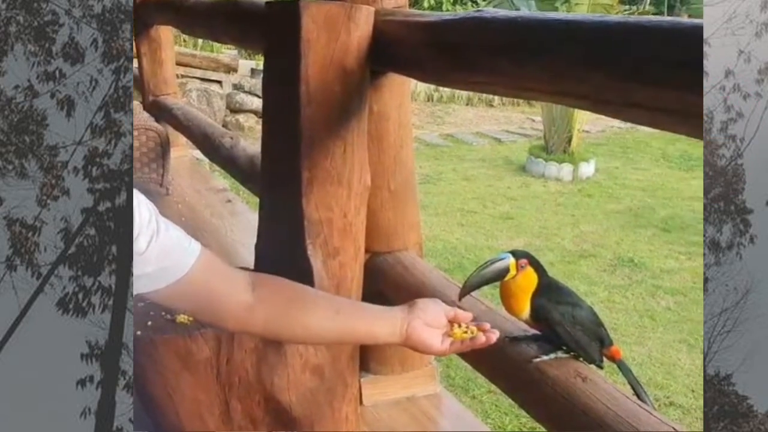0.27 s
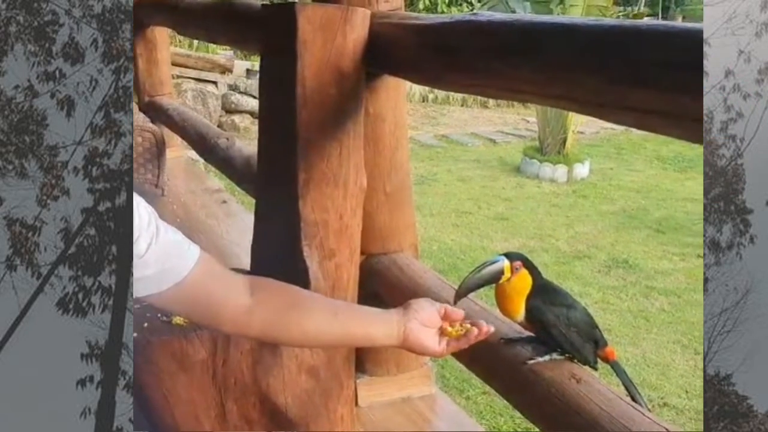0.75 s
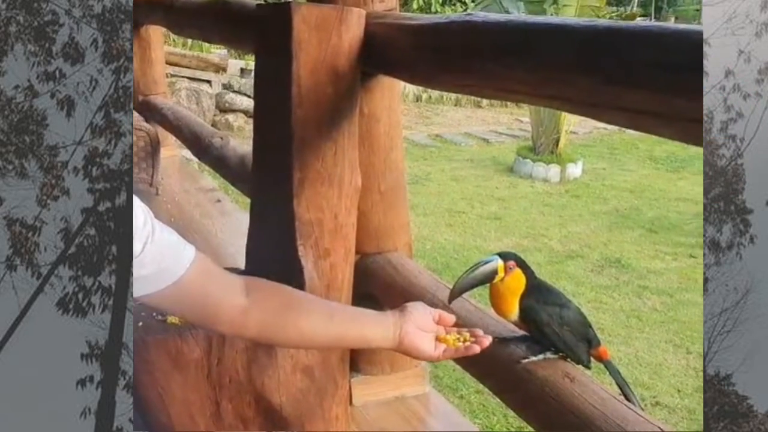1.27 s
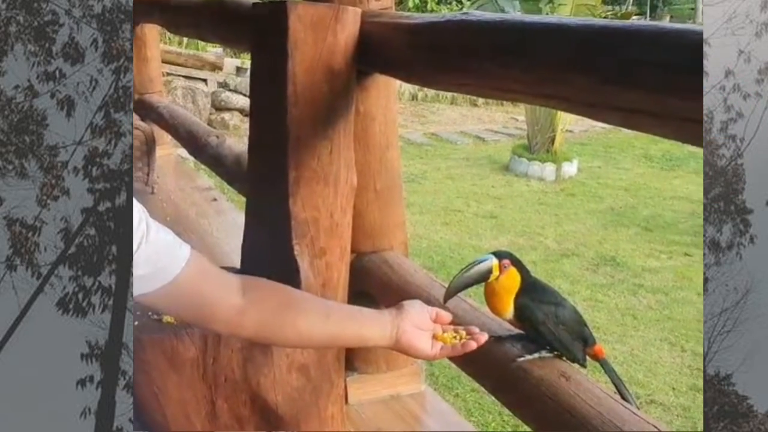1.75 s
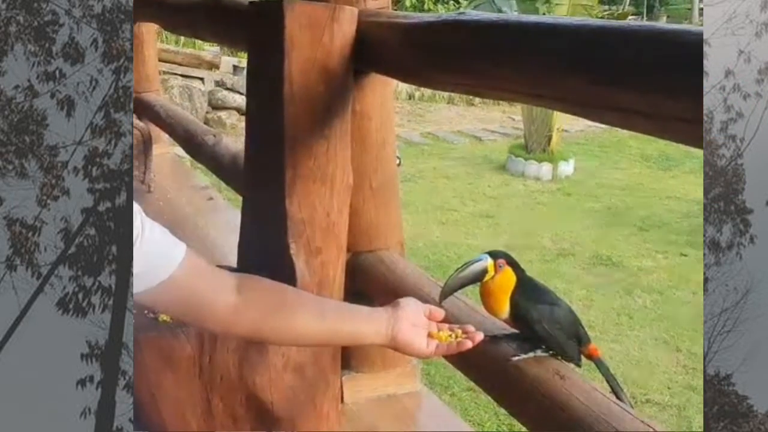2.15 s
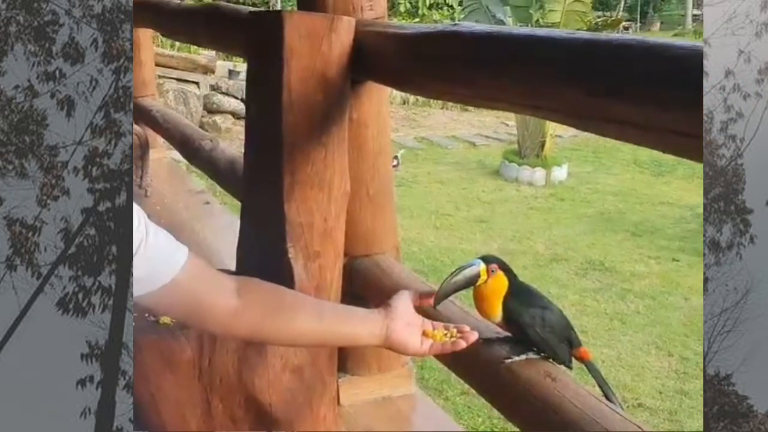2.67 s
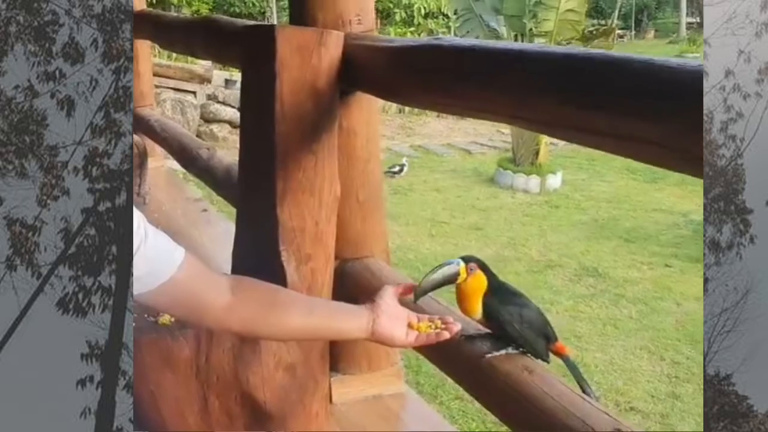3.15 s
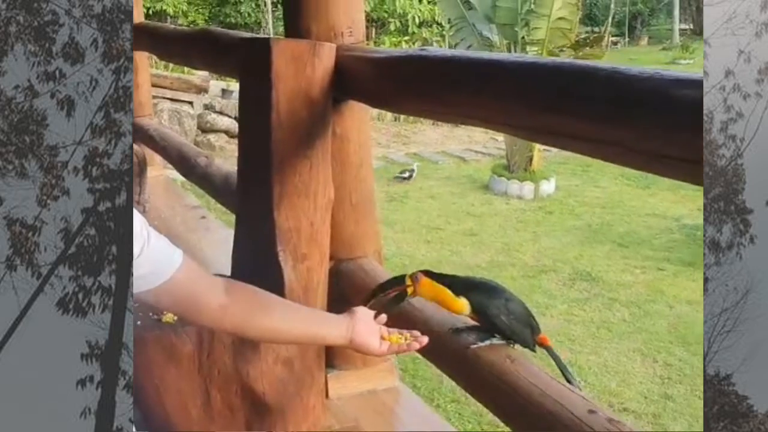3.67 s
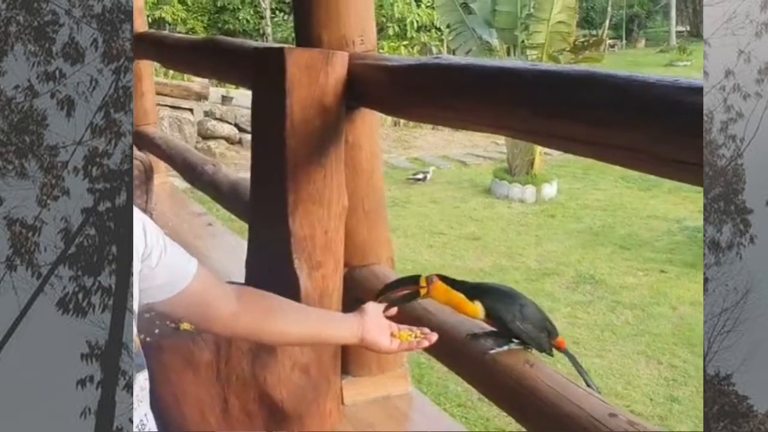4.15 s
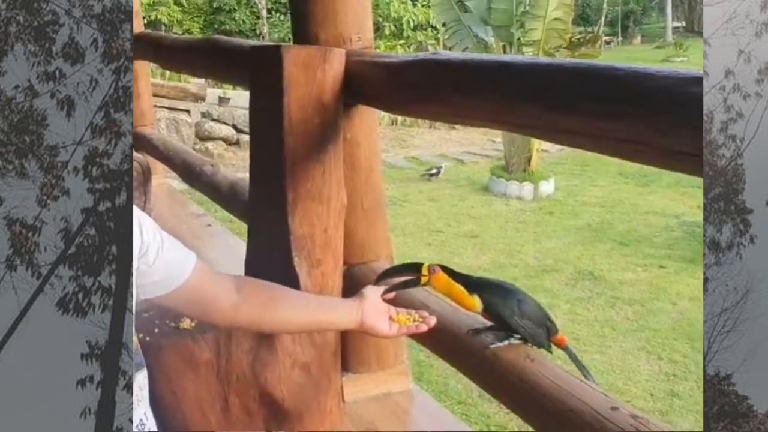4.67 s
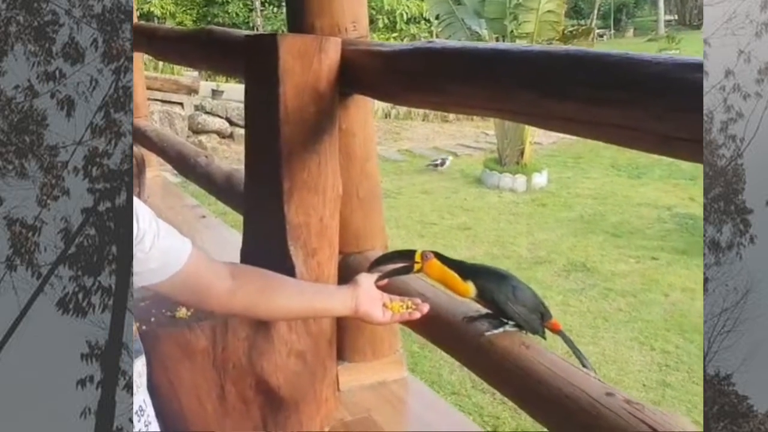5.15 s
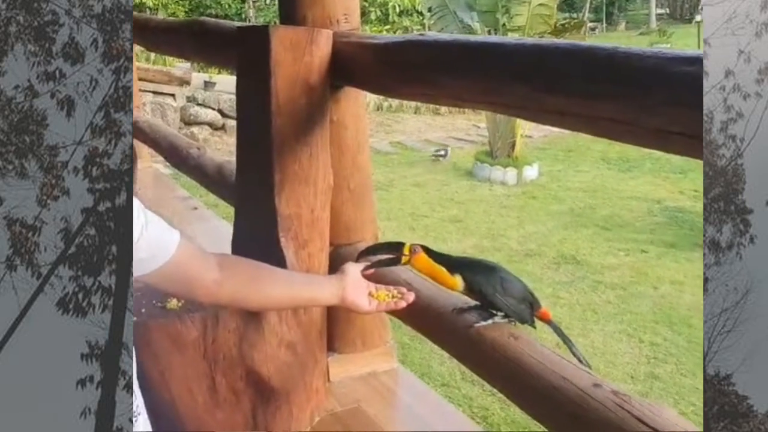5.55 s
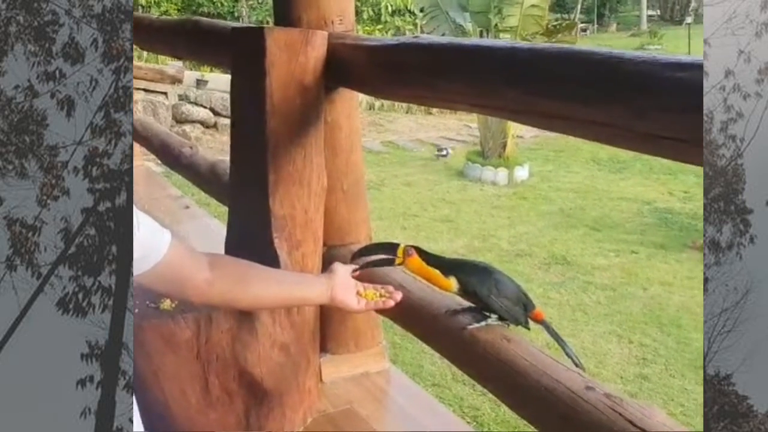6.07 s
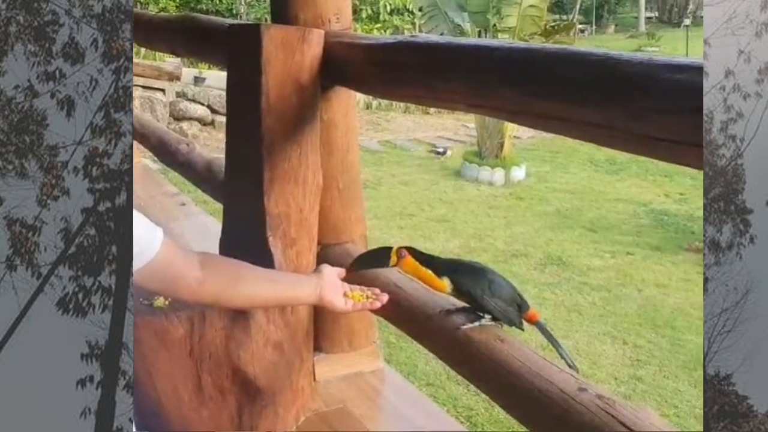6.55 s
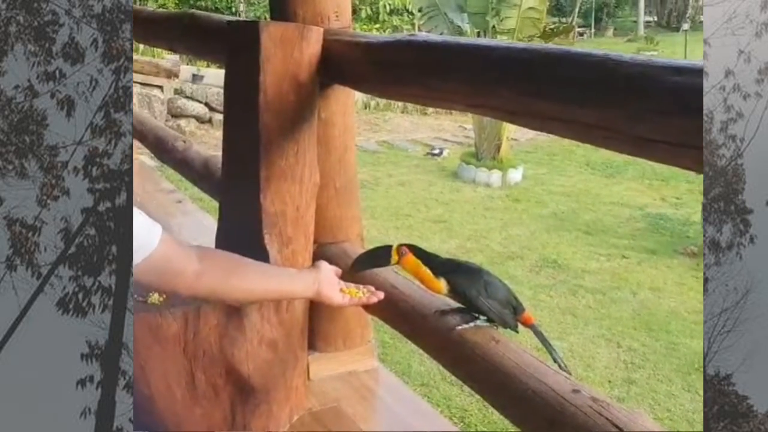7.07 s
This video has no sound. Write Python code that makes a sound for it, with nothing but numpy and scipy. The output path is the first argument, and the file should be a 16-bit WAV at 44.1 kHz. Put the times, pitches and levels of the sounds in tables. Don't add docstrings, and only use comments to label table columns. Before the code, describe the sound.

Outdoors by a wooden porch, a close toucan makes five brief hoarse rattles, each a fast run of about eight knocking pulses. Between them small birds whistle clear, slightly arched notes and quick falling chirps, blurred by tree echo. Later a few dry bill and claw ticks fall on wood. Soft airy hiss and very faint low rumble lie below; a handheld microphone with automatic level.

```python
import sys
import numpy as np
from scipy import signal
from scipy.fft import rfft, irfft
from scipy.io import wavfile
from scipy.ndimage import uniform_filter1d, minimum_filter1d

SR = 44100
rng = np.random.default_rng(int(sys.argv[2]) if len(sys.argv) > 2 else 0)


def gain_from_decibels(decibels):
    exponent = np.asarray(decibels, float) / 20
    return 10 ** exponent


def to_wav(s):
    ch = np.atleast_2d(s).T
    pcm = np.round(np.clip(ch, -1, 1) * 32767)
    wavfile.write(sys.argv[1], SR, pcm.astype(np.int16))


N = 322371


def unit(x):
    return x / np.sqrt(np.mean(x ** 2) + 1e-20)


def resonance(x, hz, width_hz):
    r = np.exp(-np.pi * width_hz / SR)
    b = np.array([1, 0, -1]) * (1 - r * r) / 2
    a = [1, -2 * r * np.cos(2 * np.pi * hz / SR), r * r]
    return signal.lfilter(b, a, x + 1e-18)


def drift(rate_hz):
    r = np.exp(-80 * np.pi * rate_hz / SR)
    slow = signal.lfilter([1], [1, -2 * r, r * r], rng.standard_normal(N // 40 + 2002))[2000:]
    return np.interp(np.arange(N) / 40, np.arange(len(slow)), unit(slow))


def flicker_noise(points, edges_hz):
    hz = np.maximum(np.fft.rfftfreq(N, 1 / SR), 1)
    point_hz, point_db = np.transpose(points)
    colour = gain_from_decibels(np.interp(np.log(hz), np.log(point_hz), point_db))
    spectrum = rfft(rng.standard_normal(N)) * colour
    out = np.zeros(N)
    for low, high in zip(edges_hz, edges_hz[1:]):
        band = irfft(spectrum * ((hz >= low) & (hz < high)), N)
        out += band * gain_from_decibels(1.13 * drift(6.9) + 0.99 * drift(52))
    return unit(out)


def machines():
    # (time [s], length [s], level [dB])
    passes = [
        (.4, 0.15, -62),
        (.71, 0.6, -67.5),
        (2.05, .43, -76),
    ]
    t = np.arange(N) / SR
    level = gain_from_decibels(-80 - 0.5 * drift(2.5))
    for s, length_s, level_db in passes:
        inside_s = np.minimum(t - s, s + length_s - t)
        level = level + gain_from_decibels(level_db) * np.clip(inside_s / .05 + .5, 0, 1)
    rumble = resonance(resonance(rng.standard_normal(N), 95, 70), 95, 120)
    hum = resonance(rng.standard_normal(N), 243.1, 11.0)
    return unit(rumble) * level + unit(hum) * gain_from_decibels(-67 + 0.87 * drift(3.1))


def floor():
    # (frequency [Hz], density [dB per Hz])
    air_points = [(18, -80), (30, -37.5), (98, -27.5), (160, -26.5), (239, -27), (285, -19), (488, -21),
                  (637, -12.5), (712, -9), (762, -6), (1190, -14.5), (1700, 0.5), (2270, -15.5),
                  (3550, 0.5), (6200, -15.5), (8060, -44), (13600, -120)]
    # (frequency [Hz], density [dB per Hz])
    hiss_points = [(3650, -34), (6200, -3), (6320, -6), (7370, 1), (7740, -0.5), (8760, -17.5), (9730, -18),
                   (10300, -19.5), (11100, -26), (12100, -27), (12600, -52.5), (15200, -41)]
    # (time [s], level [dB])
    gain_points = [(0, 0), (1.5, 1.7), (2.4, 2), (2.53, -1.5), (2.9, -1), (3.6, -1), (4.0, 1.1),
                   (5.33, 2.4), (5.43, -2), (6.5, -1.5), (6.92, 0), (7.31, 0)]
    air = flicker_noise(air_points, [0, 300, 600, 1200, 2200, 3000, 4200, 6200])
    hiss = flicker_noise(hiss_points, [6200, 8500, 12000, SR])
    gain_db = np.interp(np.arange(N) / SR, *np.transpose(gain_points))
    return (air * gain_from_decibels(-32.5) + hiss * gain_from_decibels(-44)) * gain_from_decibels(gain_db)


def trees(x, direct_db, wet_db, t60_s, onset_s):
    t = np.arange(int(.9 * SR)) / SR
    echo = rng.standard_normal(len(t)) * gain_from_decibels(-60 * t / t60_s) * (1 - np.exp(-t / onset_s))
    echo *= gain_from_decibels(wet_db) / np.sqrt(np.sum(echo ** 2))
    echo[0] = gain_from_decibels(direct_db)
    cut = round(5.532 * SR)
    before, after = [signal.fftconvolve(part, echo)[:len(part)] for part in (x[:cut], x[cut:])]
    fade = np.clip(np.arange(cut)[::-1] / (0.0071 * SR), 0, 1)
    return np.concatenate([before * fade, after])


def sing(notes, overtone_db, waver_hz):
    out, waver = np.zeros(N), waver_hz * drift(59.4)
    for rows in notes:
        s, hz, level_db = np.transpose(rows)
        i = np.arange(max(round(s[0] * SR), 0), min(round(s[-1] * SR), N))
        phase = 2 * np.pi * np.cumsum(np.interp(i / SR, s, hz) + waver[i]) / SR
        edge = np.clip(np.minimum(i - i[0], i[-1] - i) / (.005 * SR), 0, 1)
        level = gain_from_decibels(np.interp(i / SR, s, level_db)) * edge
        octave = level * gain_from_decibels(overtone_db) * np.sin(2 * phase)
        out[i] += np.sqrt(2) * level * (np.sin(phase) + octave)
    return out


def arches(rows, shape):
    return [[(s + length_s * u, hz * ratio ** (depth if u > .5 else 1), level_db + g)
             for u, ratio, g in shape]
            for s, length_s, hz, level_db, depth in rows]


def glides(rows, peak_at, start_db, end_db):
    shape = ((0, start_db), (peak_at, 0), (1, end_db))
    return [[(s + length_s * u, from_hz + (to_hz - from_hz) * u, level_db + g) for u, g in shape]
            for s, length_s, from_hz, to_hz, level_db in rows]


def far_birds():
    # (time [s], length [s], from [Hz], to [Hz], level [dB])
    far_rows = [(2.12, 0.021, 346, 332, -48), (1.82, 0.084, 3120, 2700, -26),
                (1.91, 0.073, 3270, 2783, -29.5), (2.19, 0.072, 3870, 2706, -27),
                (2.3, .05, 3640, 2900, -33), (2.985, 0.08, 2600, 2163, -31.5),
                (3.12, 0.12, 2260, 2160, -40), (3.27, .06, 5190, 3480, -32.5),
                (3.345, .07, 4350, 3200, -33), (3.4, 0.042, 3830, 2770, -20.5),
                (3.45, 0.049, 2680, 1830, -35.5), (3.48, 0.14, 3487, 2635, -26),
                (4.29, .05, 2190, 1580, -31.5), (4.3, 0.11, 3434, 2772, -21),
                (4.41, 0.054, 2800, 2320, -35.5), (3.985, 0.071, 3040, 2850, -30),
                (4.41, 0.052, 4580, 4640, -34.5), (5.05, 0.08, 4480, 4450, -36.5)]
    # (time [s], length [s], top [Hz], level [dB], depth of the fall [exponent])
    scoop_rows = [
        (3.71, 0.082, 4470, -23, 0.88),
        (3.86, 0.14, 4390, -25, .9),
        (4.6, .09, 4540, -19.5, 0.91),
    ]
    # (share of length [0-1], pitch [ratio], level [dB])
    scoop_shape = [(0, .83, 0), (.17, .91, -3.5), (0.328, 1.0, -4), (.75, .995, -19.5), (1, 0.77, -3)]
    notes = glides(far_rows, 0.44, -4, -5.5) + arches(scoop_rows, scoop_shape)
    return trees(sing(notes, -40, waver_hz=60), direct_db=-4, wet_db=4, t60_s=.6, onset_s=.004)


def thin_birds():
    # (time [s], length [s], from [Hz], to [Hz], level [dB])
    thin_rows = [
        (3.2, 0.093, 5950, 5840, -37),
        (3.285, 0.025, 4384, 3399, -23.5),
        (4.43, 0.085, 5890, 5730, -31),
        (4.675, 0.064, 6061, 4480, -32),
        (4.765, 0.038, 2155, 2150, -33.5),
        (5.075, 0.067, 5686, 5716, -31),
        (5.995, 0.05, 4840, 4770, -41),
    ]
    song = sing(glides(thin_rows, .55, -8, -5), -40, waver_hz=60)
    return trees(song, direct_db=-.5, wet_db=5, t60_s=.6, onset_s=.006)


def sweeping_birds():
    # (time [s], length [s], from [Hz], to [Hz], level [dB])
    sweep_rows = [(.417, .018, 6200, 5280, -36.5), (.56, 0.076, 2686, 1700, -31),
                  (1.54, 0.048, 2766, 2070, -39), (1.8, .03, 2890, 2050, -35.5),
                  (2.11, 0.071, 2772, 1860, -38.5), (2.17, 0.099, 1920, 1800, -43),
                  (2.36, 0.034, 2196, 1957, -37), (4.72, 0.044, 4690, 3114, -23.5),
                  (4.812, .028, 4030, 3740, -27), (5.3, 0.085, 2830, 1688, -34.5),
                  (6.145, .04, 2820, 2210, -39.5), (7.23, 0.034, 2886, 2110, -37.5),
                  (7.268, 0.0294, 2680, 2130, -42)]
    song = sing(glides(sweep_rows, .6, -1.5, -1.5), -35, waver_hz=15)
    return trees(song, direct_db=5, wet_db=3.5, t60_s=.55, onset_s=.01)


def arched_whistles():
    # (time [s], length [s], top [Hz], level [dB], depth of the fall [exponent])
    whistle_rows = [
        (-.07, 0.11, 3530, -23.5, 0.87),
        (.815, 0.094, 3486, -22, 0.84),
        (1.21, 0.21, 3615, -18.5, 0.81),
        (1.42, 0.094, 3550, -26.5, 1),
        (1.79, 0.064, 3145, -19, 0.67),
        (3.25, 0.16, 3170, -28, 0.92),
        (4.26, 0.081, 3475, -26, 0.28),
        (6.01, 0.097, 3497, -18.5, .9),
    ]
    # (share of length [0-1], pitch [ratio], level [dB])
    arch_shape = [(0, .96, -11.5), (.2, 0.97, -1), (.35, 0.98, 1.7), (.6, 0.99, -2.5), (1, .89, -10)]
    song = sing(arches(whistle_rows, arch_shape), -22, waver_hz=30)
    return trees(song, direct_db=-2.5, wet_db=-1, t60_s=.65, onset_s=.008)


def near_whistles():
    # (time [s], pitch [Hz], level [dB])
    near_rows = [
        [(2.39, 3280, -34.5), (2.42, 3580, -14.5), (2.46, 3665, -9), (2.49, 3660, -6.5), (2.515, 3664, -19),
         (2.532, 3553, -10), (2.55, 3470, -18.5), (2.58, 3380, -11)],
        [(5.315, 3175, -25), (5.362, 3420, -24), (5.372, 3406, -10.5), (5.39, 3523, -9.5), (5.398, 3520, -19.5),
         (5.42, 3510, -15), (5.465, 3514, -10), (5.50, 3275, -15.5), (5.535, 3060, -31)],
    ]
    song = sing(near_rows, -20, waver_hz=12)
    return trees(song, direct_db=-.5, wet_db=-7, t60_s=.7, onset_s=.04)


def ticks():
    # (time [s], peak [dB], ring [Hz], width [Hz])
    tick_rows = [
        (4.091, -33, 1060, 60),
        (5.211, -23, 4500, 2500),
        (5.927, -21, 5200, 4000),
        (6.595, -19, 2400, 3500),
        (6.911, -22, 4500, 700),
        (6.915, -25.5, 1105, 89.5),
        (7.156, -20, 4920, 500),
    ]
    out = np.zeros(N)
    for s, level_db, hz, width_hz in tick_rows:
        click = np.zeros(1500)
        click[:40] = rng.standard_normal(40)
        ring = resonance(resonance(click, hz, 3 * width_hz), hz, width_hz)
        i = round(s * SR)
        out[i:i + 1500] += gain_from_decibels(level_db) * ring / np.abs(ring).max()
    return trees(out, direct_db=0, wet_db=-6, t60_s=.25, onset_s=.003)


def throat_pulse(modes, stretch):
    snap_s = .01
    t = np.arange(int(.04 * SR)) / SR
    snap = signal.chirp(t, 5200, snap_s, 450, method="logarithmic")
    snap = snap * (t < snap_s) * np.minimum(t / .0008, 1)
    pulse = np.zeros(len(t))
    for hz, width_hz, level_db in modes:
        ring = resonance(resonance(snap, hz * stretch, 2.5 * width_hz), hz * stretch, width_hz)
        pulse += gain_from_decibels(level_db) * ring
    return pulse / np.abs(pulse).max()


def rattle():
    # (time [s], length [s], slowing [share])
    croak_rows = [
        (.1989, .1567, .21),
        (2.5491, .1596, .15),
        (3.6965, .1779, .19),
        (4.8199, .1597, .22),
        (6.6877, .1806, .24),
    ]
    # (mean [dB], growth over croak [dB], bill opening [dB], middle resonances [dB])
    effort_rows = [
        (-10.5, .5, -4.5, -18),
        (-12, 4.5, -4.5, -20),
        (-12.5, 5, -10, -20.5),
        (-11, 1.2, -3, -18.5),
        (-8.5, 5, -6.5, -25.5),
    ]
    pulses = []
    for (s, length_s, slowing), (mean_db, growth_db, open_db, mid_db) in zip(croak_rows, effort_rows):
        gaps = 1 + slowing * np.linspace(-1, 1, round(length_s / .0226))
        t = np.append(0, np.cumsum(gaps)) * length_s / len(gaps)
        u = t / length_s
        chance_db = 1.07 * rng.standard_normal((3, len(t)))
        level_db = mean_db + growth_db * (u - .5) - 4.5 * np.exp(-t / 0.016) + chance_db[0]
        level_db[8:9] -= 7.5
        upper_db = open_db - 8.5 * (2 * u - 1) ** 4 + chance_db[1]
        middle_db = mid_db + 10 * np.sin(np.pi * u) + chance_db[2]
        pulses += zip(s + t, level_db, upper_db, middle_db)
    return pulses


def toucan():
    # (centre [Hz], width [Hz], level [dB])
    low_throat = [(1639, 126, 2.5), (1800, 59, -20)]
    # (centre [Hz], width [Hz], level [dB])
    mid_throat = [(742, 165, -13), (1180, 310, -9.5), (2434, 83, 1.5), (2910, 89, 10.5)]
    # (centre [Hz], width [Hz], level [dB])
    high_throat = [(3420, 110, 4), (3790, 87, -6), (4470, 1200, -15.5)]
    out = np.zeros(N)
    for s, peak_db, high_db, mid_db in rattle():
        slap_chance, *chance = rng.standard_normal(7)
        effort_db = 1.25 * (peak_db + 8) - 8
        at = round((s - .0036) * SR)
        slap = at + round((.008 + .0025 * np.clip(slap_chance, -2, 2)) * SR)
        # (modes, level re effort [dB], slap re pulse [dB])
        parts = [(low_throat, 1.5, -11),
                 (mid_throat, mid_db + 7, -5),
                 (high_throat, min(high_db, -1) + 5.0, -6)]
        for (modes, rel_db, slap_db), shift, colour in zip(parts, chance[:3], chance[3:]):
            pulse = gain_from_decibels(effort_db + rel_db) * throat_pulse(modes, 1 + .02 * shift)
            out[at:at + len(pulse)] += pulse
            out[slap:slap + len(pulse)] += gain_from_decibels(slap_db + 2.5 * np.clip(colour, -2, 1)) * pulse
    return trees(out, direct_db=0, wet_db=-4.2, t60_s=.45, onset_s=.01)


def scene():
    birds = far_birds() + thin_birds() + sweeping_birds() + arched_whistles() + near_whistles()
    mic = signal.butter(6, 7900, fs=SR, output="sos")
    return (machines() + floor() + signal.sosfilt(mic, birds + ticks() + toucan()))[None]


def band_limit(x):
    return signal.sosfilt(signal.butter(12, 15360, fs=SR, output="sos"), x)


def record(dry):
    # (centre [Hz], sharpness [Q])
    port_notches = [(9650, 30), (11200, 18)]
    limit_db, release_db_per_s = -3.6, 60
    dry = signal.sosfilt(signal.butter(2, 45, "high", fs=SR, output="sos"), dry)
    for hz, q in port_notches:
        dry = .3 * dry + .7 * signal.lfilter(*signal.iirnotch(hz, q, fs=SR), dry)
    over_db = np.maximum(20 * np.log10(np.abs(dry[0]) + 1e-9) - limit_db, 0)
    ramp_db = release_db_per_s * np.arange(N) / SR
    held_db = np.maximum.accumulate(over_db + ramp_db) - ramp_db
    duck_db = uniform_filter1d(-minimum_filter1d(-held_db, size=177), size=89)
    stop = np.clip(np.arange(N)[::-1] / (.004 * SR), 0, 1)
    return band_limit(dry * stop * gain_from_decibels(-duck_db))


dry = scene()
out = record(dry)
to_wav(out)
```